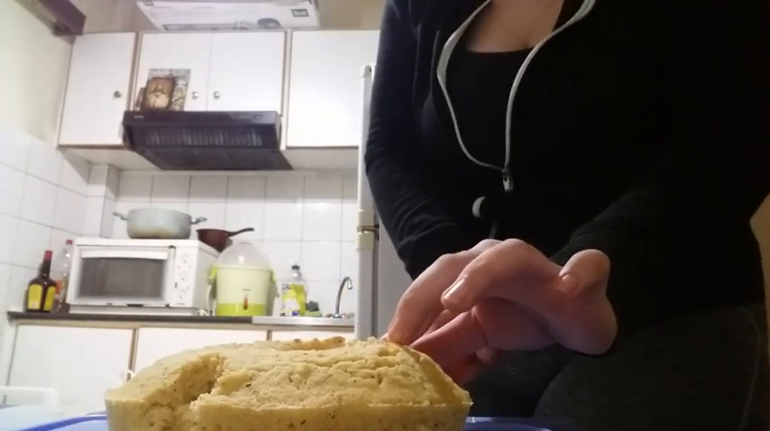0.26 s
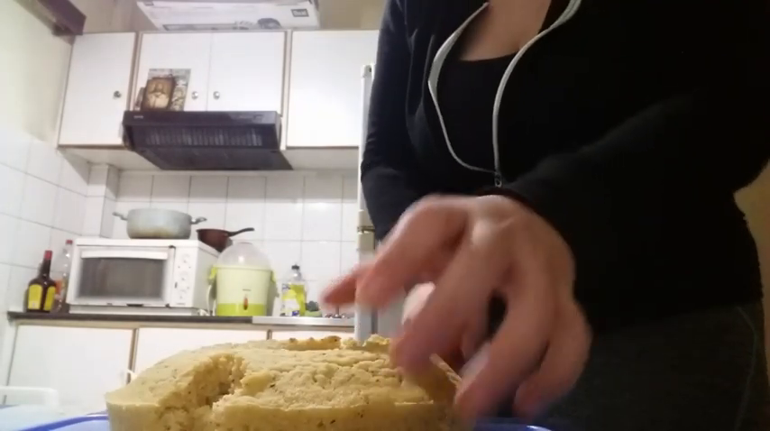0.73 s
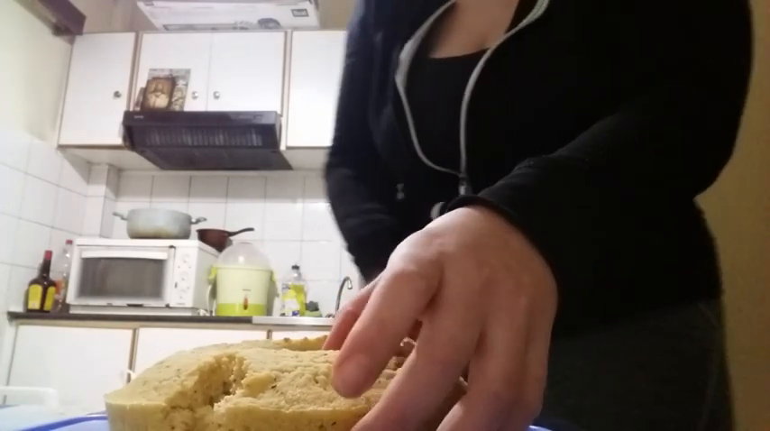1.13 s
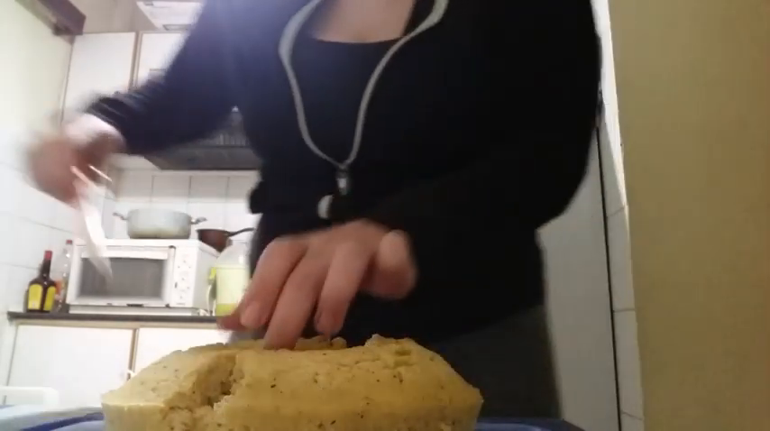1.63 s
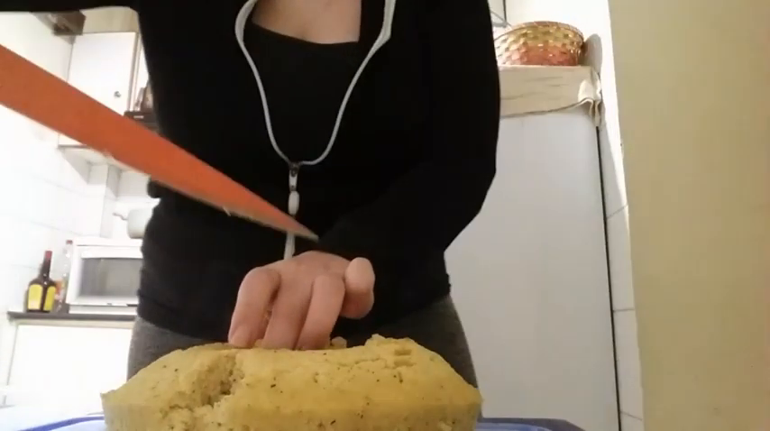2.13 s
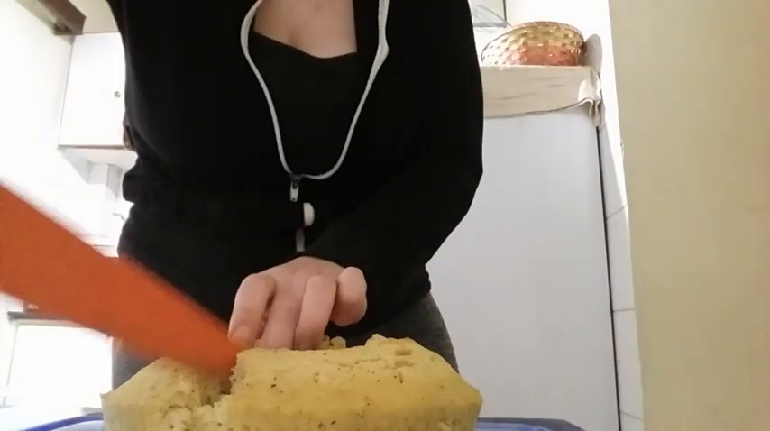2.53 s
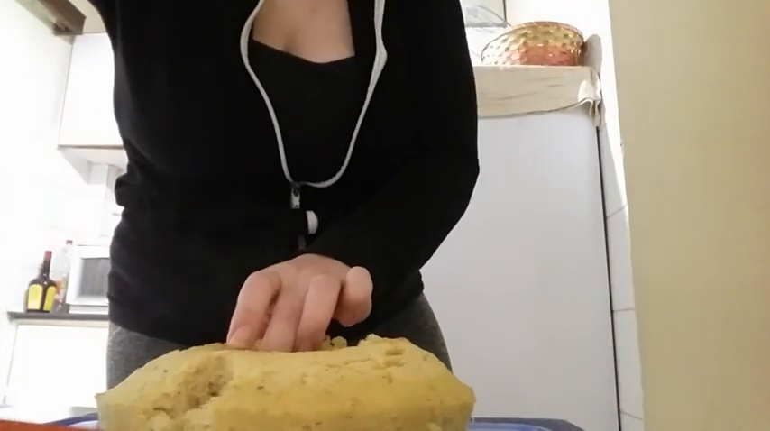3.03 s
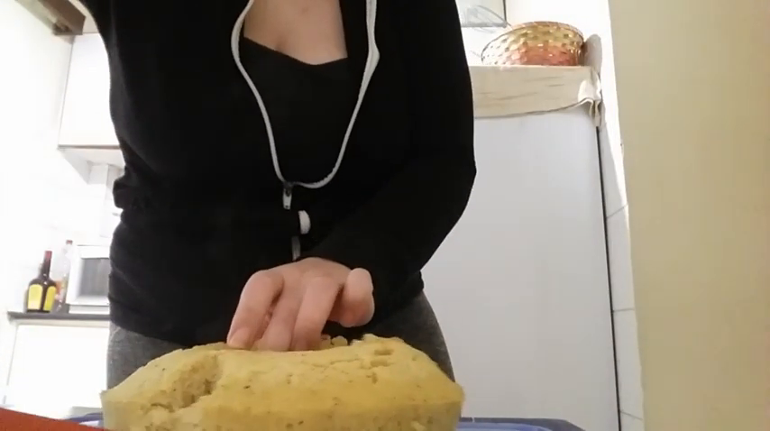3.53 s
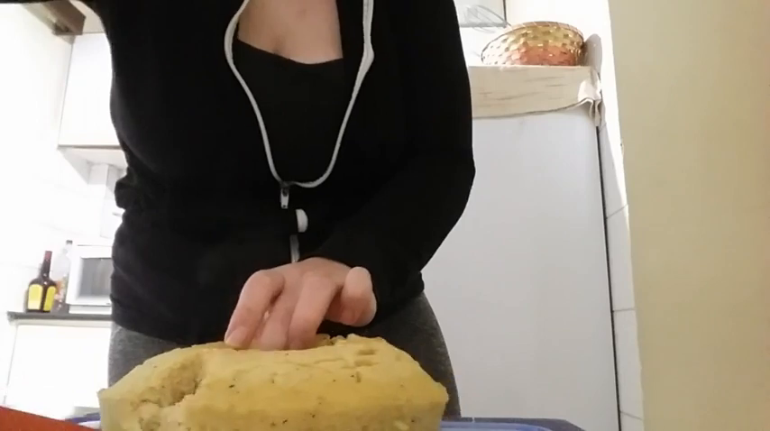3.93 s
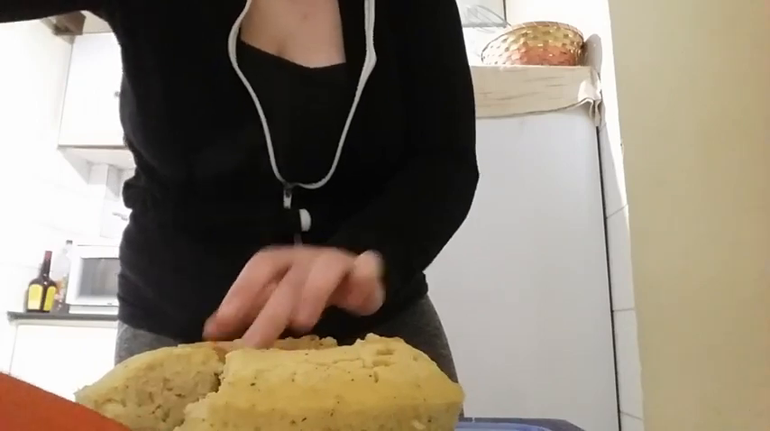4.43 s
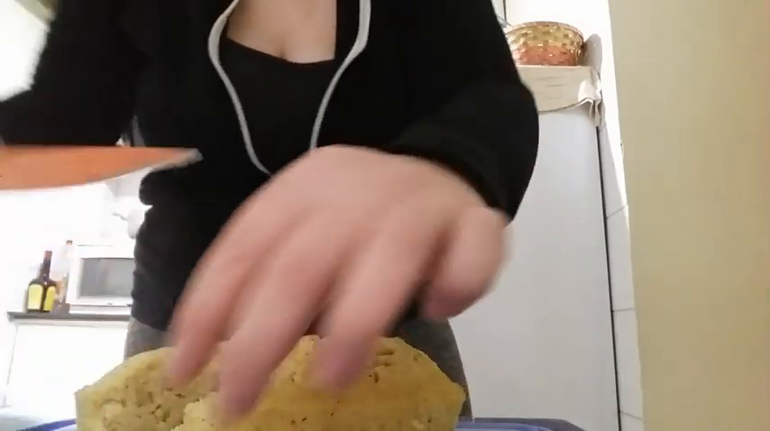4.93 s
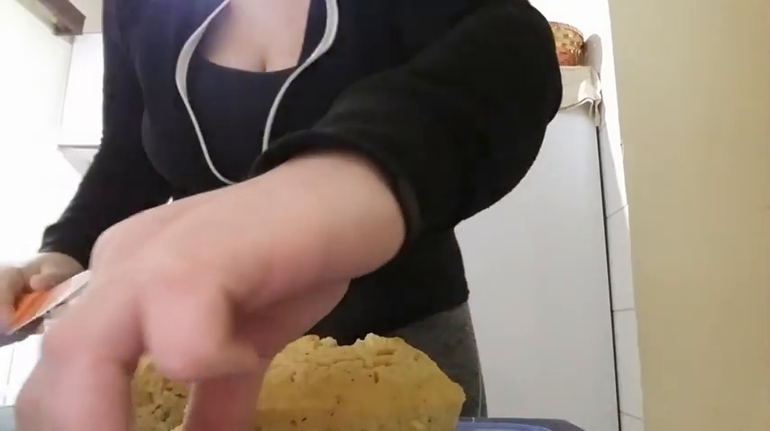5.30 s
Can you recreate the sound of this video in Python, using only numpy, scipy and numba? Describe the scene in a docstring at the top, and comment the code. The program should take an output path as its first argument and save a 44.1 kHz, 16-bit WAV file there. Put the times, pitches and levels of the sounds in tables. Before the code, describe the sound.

A close stereo scene in a small tiled kitchen, with steady low room tone and table rumble. From 0 to 1.3 s a hollow plastic container under a loaf is pushed: a thud at 0.2, a dense loudest cluster of boomy knocks at 0.5-0.7, sharper double crack near 1.15, with short gritty slides between. From 1.5 to 2.4 s it is nearly quiet, only a faint airy sleeve swish and barely audible thin squeaks. At about 2.65 a small squeak and crust snap, then at 2.84 a crisp blade tick with a brief ping and hollow rocking thud. From 3.1 to 4.6 s short, low, dry saw strokes rub and scrape unevenly, with crust snaps and crackles clustered at 3.1-3.5 and brighter ones at 4.1-4.25. Quiet returns; soft container knocks come at 5.0, 5.34 and 5.52, with a faint hand rub to the end.

```python
"""A loaf on a hollow plastic container in a small tiled kitchen, right beside the microphone.
First, hands push the container so that it knocks (thuds and cracks) and slides (tiny slips) on the table.
A sleeve swishes (shaped noise) and thin squeaks sound; then the crust snaps and crackles, the blade ticks
on the rim, and short saw strokes rub and scrape. Last, the container knocks and the hand takes hold again.
Under it all lie a low table rumble and steady room tone, both made from coloured noise."""
import sys
import numpy as np
from scipy import signal
from scipy.fft import rfft, irfft
from scipy.io import wavfile
from numba import njit

SR = 44100
rng = np.random.default_rng(int(sys.argv[2]) if len(sys.argv) > 2 else 0)


def dump(signal):
    """Clip the signal to [-1, 1] and save it as 16-bit WAV at the path in sys.argv[1]."""
    limited = np.clip(np.atleast_2d(signal).T, -1, 1)
    pcm = np.round(limited * 32767).astype(np.int16)
    wavfile.write(sys.argv[1], SR, pcm)


N = 245195
TIME = np.arange(N) / SR

# Levels in the tables are relative: the sources add their own offsets.
# steady kitchen background, spectrum: f/Hz, level/dB
ROOM_SPECTRUM = [(15, -72.5), (25, -21), (59, -53), (119, -3.5), (183, -15.5), (215, -19.5), (253, -12.5),
                 (368, -21.5), (399, -17.5), (567, -23), (945, -24.5), (1240, -29), (2420, -31.5),
                 (3000, -38), (15500, -53.5)]
# low rumble of the table, spectrum: f/Hz, level/dB
RUMBLE_SPECTRUM = [(30, -39.5), (50, -13.5), (70, 1.5), (100, -3.5), (170, -8), (300, -32), (1000, -62)]
# hand or knife presses down and loads the table: start t/s, length t/s, level/dB
LEANS_ON_TABLE = [(0, 0.5, -57.5), (0.38, 0.12, -62), (0.59, 0.63, -59.5), (2.6, 0.31, -55),
                  (3.12, 0.49, -55), (3.664, 0.61, -59), (4.503, 0.056, -64), (5.329, 0.031, -53.5)]
# the sleeve swishes as the knife is raised: t/s, level/dB
SLEEVE_SWISH = [(1.5, -82), (1.75, -76.5), (2.05, -69.5), (2.2, -75.5), (2.45, -92)]
# sound of the sleeve, spectrum: f/Hz, level/dB
SLEEVE_SPECTRUM = [(1000, -7.5), (2400, -6), (3700, -8), (4700, 0.5), (5600, -18.5), (8000, -43.5)]
# thin squeaks: start t/s, length t/s, centre f/Hz, width f/Hz, level/dB
THIN_SQUEAKS = [(1.58, 0.18, 5090, 21.2, -74), (1.824, 0.021, 5130, 50.3, -73),
                (2.157, 0.067, 6330, 270, -79), (2.66, 0.038, 2720, 300, -61),
                (2.666, 0.027, 5000, 1200, -64)]
# colour of the kitchen's echo: f/Hz, level/dB
ECHO_COLOUR = [(60, 7.5), (200, -3), (500, -6.5), (1000, -1), (2500, -5.5), (4600, 1.5), (6000, -5.5),
               (12000, -4)]
# how the hollow container colours what rubs or knocks on it: f/Hz, level/dB
HOLLOW_COLOUR = [(190, 0.5), (330, -0.5), (430, 1.5), (560, -1), (770, 3.5), (1000, 3), (1300, -1),
                 (1900, -0.5), (2450, 1.5), (3500, -0.5)]
# colour difference between the two microphone ports: f/Hz, left minus right level/dB
PORT_COLOUR = [(110, -2), (400, 1.9), (700, -0.1), (1300, -1.7), (2400, -0.5), (4400, -3), (8000, -0.5)]
# the container knocks on the table: t/s, crack level/dB, treble level/dB, thud level/dB, thud f/Hz
TABLE_KNOCKS = [(0.0339, -54.5, -58, -53, 118), (0.2162, -31.5, -57, -19, 227),
                (0.5196, -46, -55.5, -33.5, 305), (0.5514, -43, -63, -35, 171),
                (0.607, -48, -56.5, -38, 288), (0.6315, -32.5, -37.5, -28.5, 305),
                (0.6408, -26, -31.5, -11.5, 281), (0.6532, -28, -37.5, -26.5, 242),
                (0.6752, -36, -36, -17, 307), (0.8711, -66, -73, -40, 320), (1.1103, -40, -46, -35.5, 405),
                (1.1465, -28.5, -34.5, -34, 426), (1.1523, -28.5, -43.5, -27.5, 440),
                (5.001, -57, -75, -46.5, 149), (5.3409, -51.5, -71, -34, 241),
                (5.5183, -48.5, -72, -44, 163)]
# ring of the container's walls: f/Hz, level/dB, time to fall by 60 dB t/s
CONTAINER_RING = [(167, -27, .2), (236, -20, .22), (307, -21, .2), (412, -22, .15), (480, -22, .06),
                  (552, -24, .08), (786, -29, .07), (954, -29, .06)]
# pushes over the table: start t/s, length t/s, rub level/dB, scrape level/dB, full-speed rub f/Hz
TABLE_PUSHES = [(0.0, 0.061, -57.5, -65.5, 240), (0.14, 0.17, -52.5, -66, 240), (0.31, 0.12, -50, -66, 340),
                (0.47, 0.13, -40.5, -59, 310), (0.645, 0.098, -32.5, -45.5, 326),
                (0.765, 0.2, -47.5, -59.5, 320), (0.975, 0.12, -48, -59, 460),
                (1.16, 0.054, -40, -53.5, 416), (1.212, 0.098, -43, -50.5, 322)]
# scrape on the table, spectrum: f/Hz, level/dB
TABLE_SPECTRUM = [(400, -20), (700, -24.5), (950, -17), (1250, -14.5), (2400, -13.5), (3200, -16),
                  (4600, -13.5), (5200, -20.5), (5900, -28.5), (10000, -43.5), (16000, -42)]
# the hand settles on the container: t/s, rub level/dB, scrape level/dB, rub f/Hz
HAND_REGRIP = [(5.3, -93, -101, 242), (5.42, -61.5, -68.5, 247), (5.56, -63, -71, 214)]
# the blade ticks on the rim: t/s, crack level/dB, treble level/dB, thud level/dB, thud f/Hz
RIM_TICK = [(2.842, -32.5, -30.5, -32.5, 138)]
# ring of the blade: f/Hz, level/dB, time to fall by 60 dB t/s
BLADE_RING = [(2780, -41, 0.031), (4800, -57, 0.0074), (4980, -32, 0.018), (5800, -46, 0.015)]
# the crust gives way: t/s, crack level/dB, treble level/dB, thud level/dB, thud f/Hz
CRUST_SNAPS = [(2.613, -56, -48.5, -46, 116), (2.8116, -52.5, -50, -40, 161),
               (2.9432, -50.5, -50, -49, 114), (3.1323, -51.5, -51, -43, 127), (3.1565, -44, -64, -51, 163),
               (3.2073, -47.5, -67, -32.5, 162), (3.295, -41, -48, -43.5, 180),
               (3.3005, -37, -52, -47, 279), (3.3717, -42, -58, -37.5, 240), (3.4827, -61, -58, -44.5, 194),
               (3.5027, -45.5, -46, -62, 254), (4.1094, -65, -40, -38.5, 395), (4.137, -69, -35, -74, 331),
               (4.2191, -46, -40.5, -50, 427), (4.248, -74, -74, -44, 246), (4.4173, -69, -48, -47, 238)]
# sound of the crust, spectrum: f/Hz, level/dB
CRUST_SPECTRUM = [(400, -25), (700, -22.5), (1000, -1), (1230, -10), (1600, -4), (2300, -7.5), (3000, -7.5),
                  (3600, -9), (4500, -6), (5100, -14.5), (5900, -29.5), (10000, -38.5), (16000, -58)]
# saw strokes: start t/s, length t/s, rub level/dB, scrape level/dB, full-speed rub f/Hz
SAW_STROKES = [(3.11, 0.2, -50.5, -62.5, 228), (3.36, 0.083, -55.5, -65, 248),
               (3.49, 0.078, -51, -54.5, 228), (3.6, 0.12, -56, -61.5, 235), (3.74, 0.13, -48, -55.5, 280),
               (3.885, 0.165, -47, -56, 276), (4.07, 0.16, -47.5, -53.5, 365),
               (4.275, 0.04, -52.5, -65.5, 333), (4.315, 0.11, -55.5, -62.5, 403),
               (4.515, 0.062, -46.5, -54, 242)]

ROOM_TONE_DB, RESTING_RUMBLE_DB = -61.5, -73
LEAN_ATTACK_S, LEAN_RELEASE_DB_PER_S = 0.018, 118.5
KITCHEN_T60_S = 0.33  # the echo falls by 60 dB in this time
CUTOFF_HZ = 15800


def from_db(db):
    """Turn decibels into gain."""
    return 10 ** (np.asarray(db) / 20)


def rms_one(x):
    """Scale a signal to rms (average strength) 1."""
    return x / np.sqrt(np.mean(x ** 2) + 1e-20)


def at_hz(points, size):
    """Read a table between its points, on a log-frequency axis, at each bin of a transform."""
    hz, value = np.transpose(points)
    bins_hz = np.fft.rfftfreq(size, 1 / SR) + 1e-3
    return np.interp(np.log(bins_hz), np.log(hz), value)


def coloured(x, spectrum):
    """Shape the spectrum of a sound and scale it to rms 1."""
    size = x.shape[-1]
    return rms_one(irfft(rfft(x) * from_db(at_hz(spectrum, size)), size))


def passed(x, hz, kind, order=2):
    """Let through only what lies below ("low") or above ("high") a frequency."""
    return signal.sosfilt(signal.butter(order, hz, kind, fs=SR, output="sos"), x + 1e-18)


def drift(rate):
    """Wander smoothly at random between about `rate` new values a second; rms 1."""
    knots = rng.standard_normal(4000)
    return rms_one(np.interp(TIME * rate, np.arange(len(knots)), knots))


def ring(clicks, hz, t60):
    """A click of size 1 starts a dying sine of height 1."""
    decay = from_db(-60 / (t60 * SR))
    turn = 2 * np.pi * hz / SR
    return signal.lfilter([0, np.sin(turn)], [1, -2 * decay * np.cos(turn), decay * decay], clicks + 1e-18)


@njit
def resonate(x, step, damping):
    """A damped resonance whose centre (radians per sample) moves."""
    out, low, band = np.zeros(len(x)), 0., 0.
    for i in range(len(x)):
        low += step[i] * band
        band += step[i] * (x[i] - low - damping * band)
        out[i] = band
    return out


def grains(per_s, spread_db, clump_db):
    """Tiny slips and breaks of uneven size, stronger in clumps; rms 1."""
    sizes = from_db(spread_db * np.minimum(rng.exponential(1, N), 4) + clump_db * drift(90))
    happens = rng.random(N) < per_s / SR
    return rms_one(happens * sizes * rng.choice([-1, 1], N))


def level(s, db):
    """Gain along a curve, fading down to -120 dB just outside it."""
    return from_db(np.interp(TIME, np.r_[s[0] - .05, s, s[-1] + .05], np.r_[-120, db, -120]))


def stereo_noise(size, likeness_hz, bass_side=0):
    """Two channels of noise that are more alike below likeness_hz."""
    mid, side = rng.standard_normal((2, size))
    side = passed(side, likeness_hz, "high", order=1) + bass_side * side
    return np.array([mid + side, mid - side])


def room_tone(likeness_hz):
    """Steady kitchen background: coloured noise, more alike in both ears in the bass."""
    return from_db(ROOM_TONE_DB) * coloured(stereo_noise(N, likeness_hz, bass_side=0.21), ROOM_SPECTRUM)


def table_rumble(side_db):
    """Rumble builds as weight comes on, holds, then sinks to a faint rest; nearly alike in both ears."""
    load = np.zeros(N)
    for start, length, db in LEANS_ON_TABLE:
        attack = np.clip((TIME - start) / LEAN_ATTACK_S, 0, 1)
        time_after = np.maximum(TIME - start - length, 0)
        load += attack * from_db(db - LEAN_RELEASE_DB_PER_S * time_after)
    mid, side = rng.standard_normal((2, N))
    noise = mid + from_db(side_db) * np.array([side, -side])
    return np.hypot(load, from_db(RESTING_RUMBLE_DB)) * coloured(noise, RUMBLE_SPECTRUM)


def kitchen(x, wet_db, pan_db, lead_ms):
    """Sound reaches the ports slightly apart (lead above 0: left first); tiles add a spread-out tail."""
    # the sources are wide, so the phase between the ports levels off in the treble
    radians = 2 * np.pi * np.fft.rfftfreq(N, 1 / SR) * lead_ms / 1000
    phase = 1.7 * np.tanh(radians / 1.7)
    sides = np.array([[.5], [-.5]])
    direct = irfft(rfft(x) * np.exp(1j * phase * sides), N) * from_db(pan_db * sides)
    t = np.arange(SR // 2) / SR
    fade_in = np.clip(t / 0.0031 - .5, 0, 1)
    tail = coloured(stereo_noise(len(t), likeness_hz=360), ECHO_COLOUR)
    tail *= from_db(-60 * t / KITCHEN_T60_S) * fade_in
    tail /= np.sqrt(np.sum(tail ** 2) / 2)
    return direct + from_db(wet_db) * signal.fftconvolve(x[None], tail, axes=1)[:, :N]


def hollow(x):
    """The container's cavity lifts some bands and swallows others."""
    return irfft(rfft(x) * from_db(at_hz(HOLLOW_COLOUR, N)), N)


def ports(x):
    """The two microphone ports hear nearby sounds in slightly different colours."""
    return irfft(rfft(x) * from_db(at_hz(PORT_COLOUR, N) * np.array([[.5], [-.5]])), N)


def sleeve_swish():
    """Cloth noise swells and fades as the knife is raised."""
    return level(*np.transpose(SLEEVE_SWISH)) * coloured(rng.standard_normal(N), SLEEVE_SPECTRUM)


def squeaks():
    """Short rubbing squeaks: noise in a limited band, rising and falling smoothly."""
    out = np.zeros(N)
    for start, length, hz, width_hz, db in THIN_SQUEAKS:
        progress = np.clip((TIME - start) / length, 0, 1)
        shape = np.sqrt(np.maximum(np.sin(np.pi * progress), 0))
        band = signal.butter(2, [hz - width_hz / 2, hz + width_hz / 2], "band", fs=SR, output="sos")
        out += from_db(db) * shape * rms_one(signal.sosfilt(band, rng.standard_normal(N)))
    return out


def contacts(rows, thud_cycles, thud_db, overtone, overtone_db, ring_db, crack_db, treble_db, crack_s):
    """Each contact: a short crack, a damped thud of the loaded base and a faint ring of the walls."""
    thuds, cracks, trebles, blows = np.zeros((4, N + SR))
    t = np.arange(SR // 8) / SR
    for s, crack, treble, thud, hz in rows:
        start = int(s * SR)
        span = slice(start, start + len(t))
        cycles = hz * t
        swing = np.sin(2 * np.pi * cycles) + from_db(overtone_db) * np.sin(2 * np.pi * overtone * cycles)
        onset = 1 - np.exp(-cycles / 0.81)  # the base needs part of a cycle to get going
        # the thud falls by 60 dB in thud_cycles swings
        thuds[span] += from_db(thud + thud_db - 60 * cycles / thud_cycles) * swing * onset
        burst = rng.standard_normal(len(t)) * np.exp(-t / crack_s)
        burst[0] += 4  # an extra click at first touch
        cracks[span] += from_db(crack + crack_db) * burst
        trebles[span] += from_db(treble + treble_db) * burst
        blows[start] = from_db(thud + ring_db)
    walls = sum(from_db(db) * ring(blows, hz, t60) for hz, db, t60 in CONTAINER_RING)
    cracks = passed(passed(cracks, 540, "high"), 2073, "low", order=4)
    trebles = passed(trebles, 2190, "high")
    # little is heard above about 5 kHz
    faint_top = from_db(-29) * passed(trebles, 9500, "low")
    trebles = passed(trebles, 4870, "low", order=8) + faint_top
    return (passed(thuds, 150, "high") + passed(walls, 210, "high") + cracks + trebles)[:N]


def container_knocks():
    """The container hits the table with cracks, deep thuds and ringing walls."""
    return contacts(TABLE_KNOCKS, thud_cycles=4.57, thud_db=16, overtone=1.573, overtone_db=-7.5,
                    ring_db=4, crack_db=11.0, treble_db=13, crack_s=0.0034)


def strokes(rows, dip_db, rise_share, fall_share, pitch_sag):
    """Each stroke speeds up, runs and slows down, softer and lower at its ends; returns a friction curve."""
    phases = [(0, 1), (rise_share, 0), (fall_share, 0), (1, 1)]  # (share of the stroke, slowness)
    curve = []
    for start, length, rub, scrape, hz in rows:
        for share, slow in phases:
            dip = slow * dip_db
            curve.append((start + share * length, rub - dip, scrape - dip, hz * (1 - pitch_sag * slow)))
    return sorted(curve)


def friction(curve, spectrum, per_s, spread_db, clump_db, damping, rub_db, scrape_db):
    """Slips shake the container at the curve's pitch (the rub) and add a brighter scrape."""
    s, rub, scrape, pitch_hz = np.transpose(curve)
    slips = grains(per_s, spread_db, clump_db)
    step = 2 * np.pi * np.interp(TIME, s, pitch_hz) / SR
    body = resonate(slips, step, damping) / np.sqrt(step)
    body = rms_one(passed(passed(body, 792, "low", order=4), 73, "high"))
    return body * level(s, rub + rub_db) + coloured(slips, spectrum) * level(s, scrape + scrape_db)


def container_slide():
    """Dense, even slips as the container is pushed over the table."""
    pushes = strokes(TABLE_PUSHES, dip_db=7, rise_share=0.19, fall_share=0.63, pitch_sag=0.66)
    return friction(pushes, TABLE_SPECTRUM, per_s=9700, spread_db=1.0, clump_db=2.5, damping=0.41,
                    rub_db=-1, scrape_db=-3.0)


def hand_regrip():
    """Sparser, uneven slips as the hand settles on the container."""
    return friction(HAND_REGRIP, CRUST_SPECTRUM, per_s=1300, spread_db=5.5, clump_db=2.0, damping=0.36,
                    rub_db=-4, scrape_db=-3)


def blade_tick():
    """The blade pings briefly and sets the container rocking."""
    strike = np.zeros(N)
    strike[int(RIM_TICK[0][0] * SR)] = 1
    ping = passed(sum(from_db(db) * ring(strike, hz, t60) for hz, db, t60 in BLADE_RING), 1200, "high")
    tick = ping + contacts(RIM_TICK, thud_cycles=17.3, thud_db=6.0, overtone=1.8, overtone_db=-21,
                           ring_db=0.5, crack_db=11.5, treble_db=2.0, crack_s=0.0012)
    # the tick is dull above about 6 kHz
    return passed(tick, 6300, "low", order=8) + from_db(-3.0) * passed(tick, 9300, "high")


def crumbs(per_s, crumb_db, lead_s, fade_db_per_s):
    """The crust crackles: small breaks build up to each snap and die away after it."""
    stress = np.zeros(N)
    for s, crack, *_ in CRUST_SNAPS:
        build_up = np.clip(1 + (TIME - s) / lead_s, 0, 1)
        stress += from_db(crack - fade_db_per_s * np.maximum(TIME - s, 0)) * build_up
    breaks = coloured(grains(per_s, spread_db=5, clump_db=7.5), CRUST_SPECTRUM)
    return from_db(crumb_db) * stress * breaks


def crust_breaking():
    """The crust gives way in snaps, with crackling around them."""
    snaps = contacts(CRUST_SNAPS, thud_cycles=3.12, thud_db=21.5, overtone=2.14, overtone_db=-14.5,
                     ring_db=9.0, crack_db=12.5, treble_db=-1.5, crack_s=0.0043)
    return snaps + crumbs(per_s=860, crumb_db=-15, lead_s=0.036, fade_db_per_s=510)


def sawing():
    """The blade slips and scrapes through the loaf in short strokes."""
    cuts = strokes(SAW_STROKES, dip_db=9.5, rise_share=0.18, fall_share=0.75, pitch_sag=0.26)
    return friction(cuts, CRUST_SPECTRUM, per_s=2200, spread_db=2.5, clump_db=1.4, damping=0.51,
                    rub_db=-0.5, scrape_db=-3)


def scene():
    """The container is shifted, the knife raised, the loaf cut and the container gripped again."""
    near = kitchen(squeaks() + sleeve_swish(), wet_db=-5.5, pan_db=1.5, lead_ms=0.057)
    near += kitchen(hollow(container_knocks()), wet_db=-9.5, pan_db=1.5, lead_ms=0.2)
    near += kitchen(hollow(container_slide()), wet_db=-7.5, pan_db=1.5, lead_ms=0.15)
    near += kitchen(blade_tick(), wet_db=-16, pan_db=-1, lead_ms=-0.17)
    near += kitchen(hollow(crust_breaking()), wet_db=-12.5, pan_db=0.0, lead_ms=0.12)
    near += kitchen(hollow(sawing() + hand_regrip()), wet_db=-7.0, pan_db=1, lead_ms=0.063)
    return ports(near) + table_rumble(side_db=-15.5) + room_tone(likeness_hz=624)


def record(dry):
    """A steep low-pass filter removes the very top."""
    return signal.sosfilt(signal.ellip(10, .1, 80, CUTOFF_HZ, fs=SR, output="sos"), dry)


dry = scene()
out = record(dry)
dump(out)
```